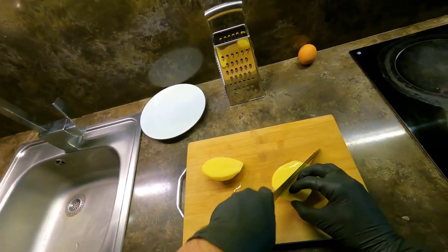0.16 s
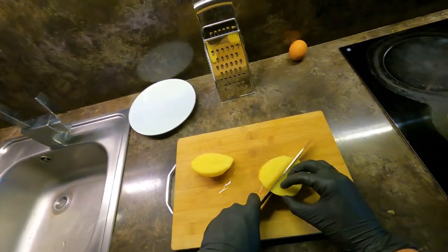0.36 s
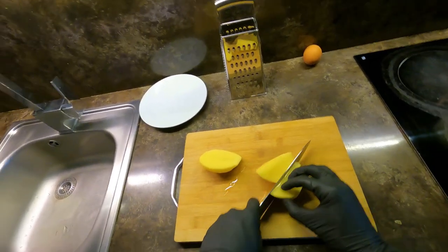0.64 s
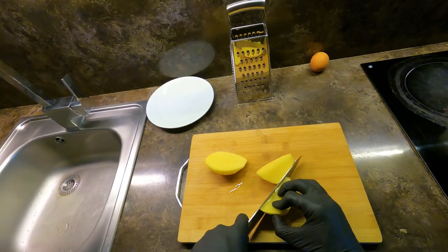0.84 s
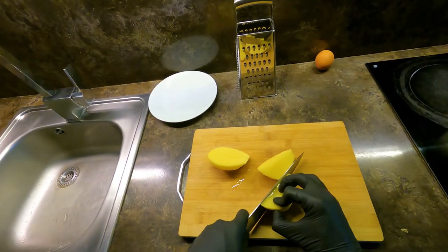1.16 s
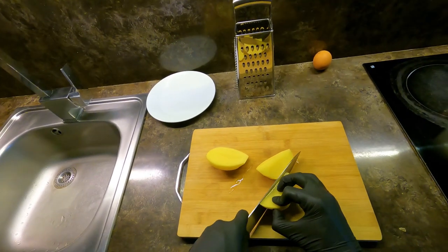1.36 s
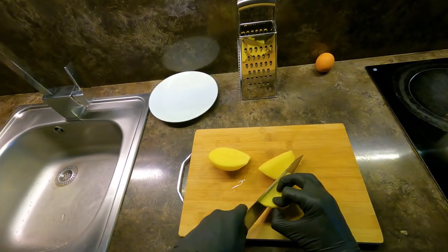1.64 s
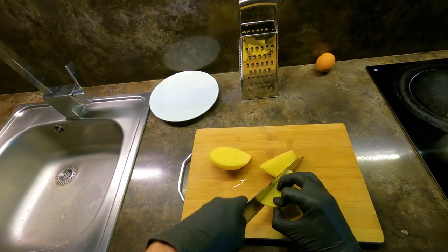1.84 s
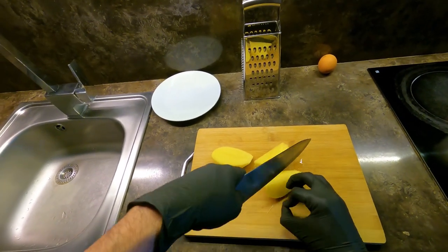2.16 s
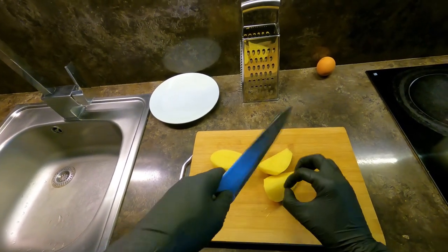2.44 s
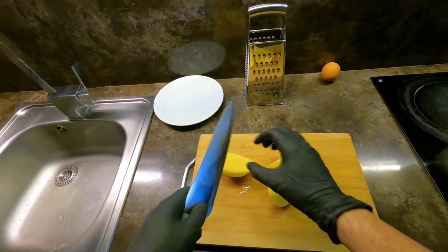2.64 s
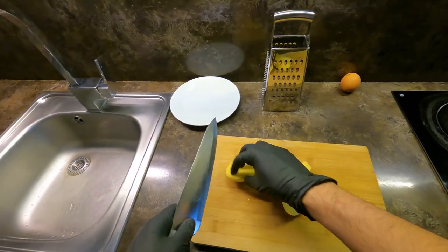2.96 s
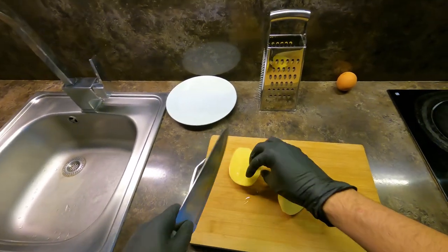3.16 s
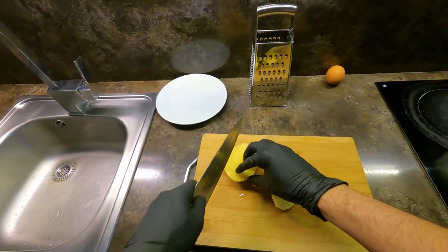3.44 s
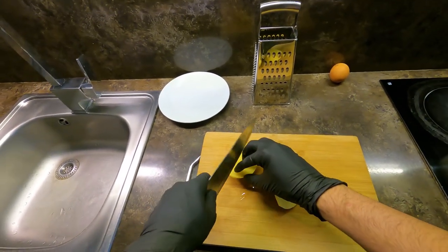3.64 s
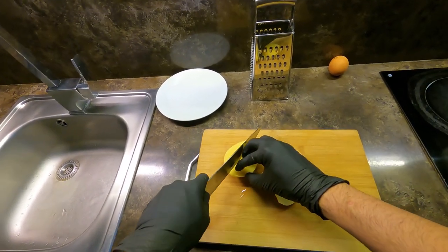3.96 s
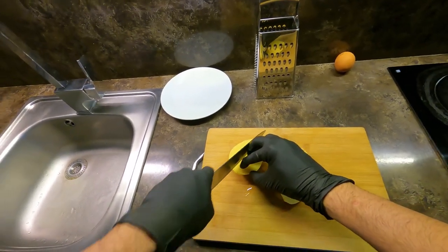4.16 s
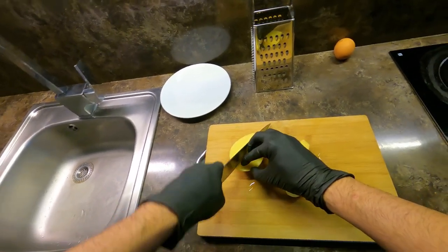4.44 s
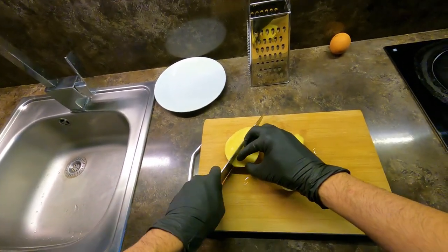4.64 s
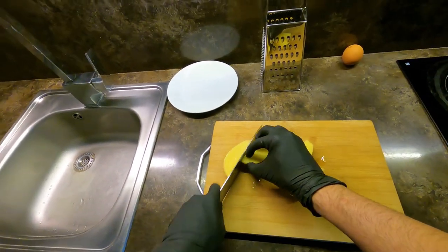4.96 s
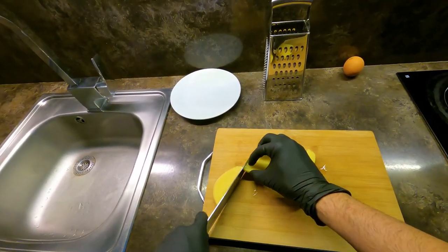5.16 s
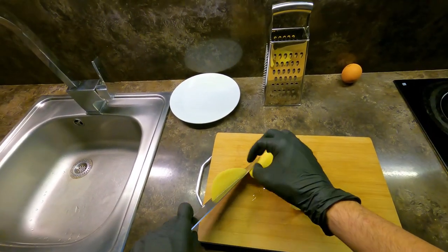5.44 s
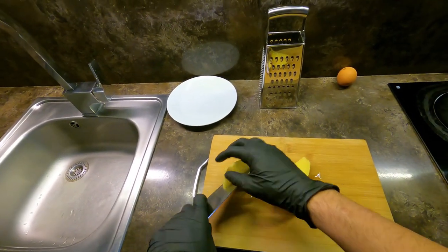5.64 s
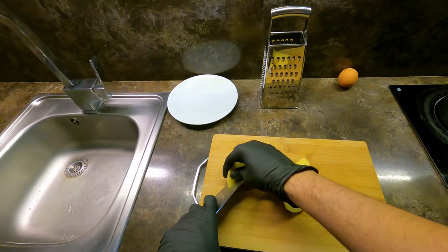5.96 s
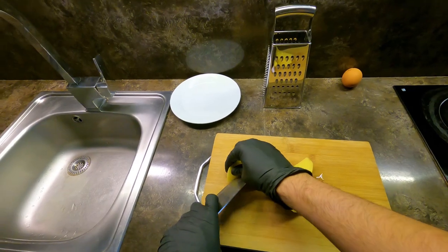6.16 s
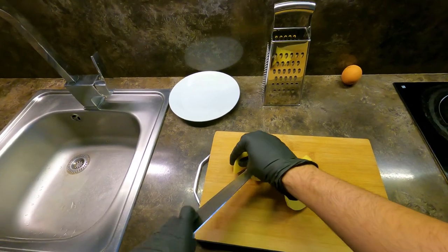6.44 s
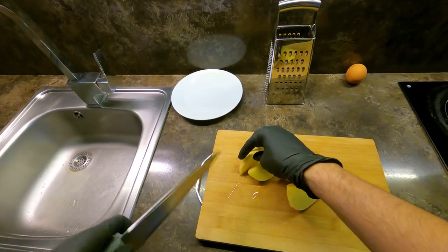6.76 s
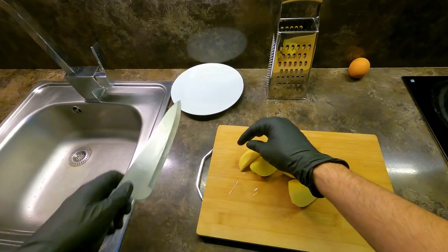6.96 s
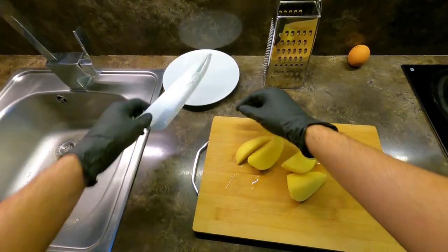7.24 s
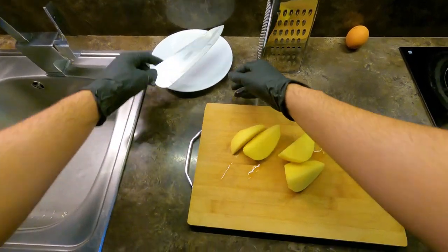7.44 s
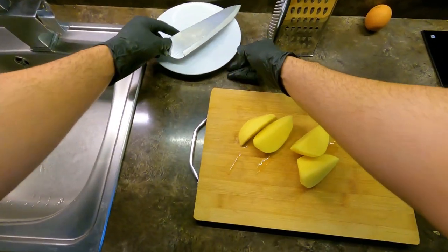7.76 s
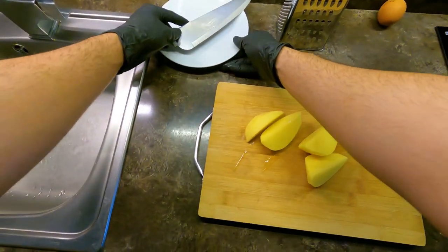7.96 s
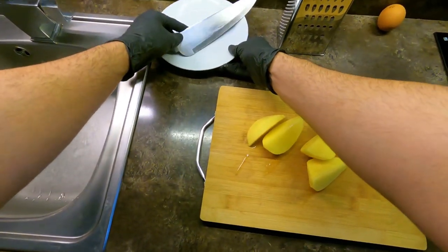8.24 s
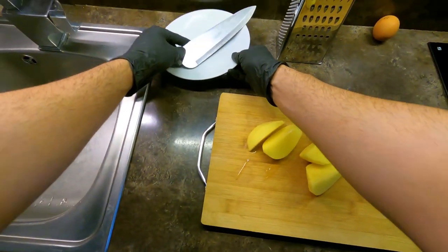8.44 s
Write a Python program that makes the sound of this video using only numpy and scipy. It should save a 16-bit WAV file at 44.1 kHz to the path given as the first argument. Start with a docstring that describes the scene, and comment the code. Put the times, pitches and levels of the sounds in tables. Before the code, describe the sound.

Close up in a small, lightly reverberant kitchen, over low moving air and faint appliance hum, a knife pushes through raw potato with juicy hiss and rasp, cracking onto a wooden board. Wedges drop with dull thuds and wet snaps. After a quieter pause with faint glove rustle, more cuts follow, the edge drags over wood and squeaks briefly. Finally handle, then blade, clink on a china plate.

```python
"""A knife cuts a raw potato on a wooden board in a small kitchen, over moving air and a steady appliance hum.
From the start bursting cells hiss and the blade's flanks rasp; the edge cracks on the board and makes it ring.
Wedges land and tip with dull thuds, wet flesh snaps and crackles, and rubber gloves rustle and squeal.
Later the edge judders along the wood, then squeaks once by stick and slip. At the end the knife is laid on a
china plate, handle first, then the blade: struck modes ring and clatter while steel rubs over the glaze."""
import sys
import numpy as np
from scipy import signal
from scipy.fft import rfft, irfft, next_fast_len
from scipy.io import wavfile

SR = 44100
rng = np.random.default_rng(int(sys.argv[2]) if len(sys.argv) > 2 else 0)


def unload_audio(sound):
    """Save the sound as a 16-bit wav file, at the path given as the first command line argument."""
    columns = np.transpose(np.atleast_2d(sound))
    # keep every value between -1 and 1, then stretch to whole-number steps
    steps = np.round(np.clip(columns, -1, 1) * 32767)
    wavfile.write(sys.argv[1], SR, steps.astype(np.int16))


N = 378819
TIME = np.arange(N) / SR
AGE = TIME[:SR * 2 // 3]   # time since a blow [s]

# Table levels are relative where a function adds gain of its own; T60 is the time of a 60 dB decay.


def from_db(db):
    """Logarithmic levels: decibels to amplitude gain."""
    return 10 ** (np.asarray(db) / 20)


def rms_one(x):
    """Normalisation: scale to an effective value of 1."""
    return x / np.sqrt(np.mean(x ** 2) + 1e-20)


def fade(t60):
    """Damping: exponential decay by 60 dB in t60 seconds after a blow."""
    return from_db(-60 * AGE / max(t60, 1e-3))


def at_hz(points, hz):
    """Logarithmic pitch: interpolate a table on a log-frequency axis."""
    known_hz, values = np.transpose(points)
    return np.interp(np.log(hz + 1), np.log(known_hz), values)


def convolve(x, response):
    """Linear superposition: every sample excites the response; the length is kept."""
    return signal.oaconvolve(x, response)[:len(x)]


def colour(x, spectrum, tilt_db=0, size=8192):
    """Minimum-phase filtering: a causal response with the spectrum, tilted in dB per octave about 1 kHz."""
    hz = np.maximum(np.arange(size // 2 + 1), 1) * SR / size
    tilt = tilt_db * np.log2(hz / 1000)
    low_rolloff = 12 * np.minimum(np.log2(hz / spectrum[0][0]), 0)   # below the first point
    db = at_hz(spectrum, hz) + tilt + low_rolloff
    # folding the cepstrum onto positive time makes the filter causal
    cepstrum = irfft(np.log(from_db(db)))[:size // 2]
    cepstrum[1:] *= 2
    return convolve(x, irfft(np.exp(rfft(cepstrum, size))))


def resonate(x, peaks):
    """Forced resonance: parallel resonators, each (frequency [Hz], width [Hz], level [dB])."""
    total = 0
    for hz, width, db in peaks:
        b, a = signal.iirpeak(hz, hz / width, fs=SR)
        total = total + from_db(db) * signal.lfilter(b, a, x)
    return total


def ring(modes):
    """Free vibration: damped sines of struck modes, each (frequency [Hz], level [dB], T60 [s])."""
    total = 0
    for k, (hz, db, t60) in enumerate(modes):
        sign = (-1) ** k
        total = total + sign * from_db(db) * fade(t60) * np.sin(2 * np.pi * hz * AGE)
    return total


def burst(t60):
    """Random impact sequence: a dying swarm of tiny contacts, of unit energy."""
    swarm = rng.standard_normal(len(AGE)) * fade(t60)
    return swarm / np.linalg.norm(swarm)


def grains(per_s, spread_db):
    """Poisson-like excitation: random micro-clicks of uneven size and sign."""
    sizes = from_db(spread_db * np.minimum(rng.exponential(1, N), 4))
    happens = rng.random(N) < per_s / SR
    return happens * sizes * rng.choice([-1, 1], N)


def drift(per_s):
    """Slow random modulation: straight lines between normal random values, per_s of them a second."""
    knots = rng.standard_normal(4096)
    return np.interp(TIME * per_s, np.arange(len(knots)), knots)


def stroke(start, length, swell_db, rise_s, release_t60):
    """Amplitude envelope of one hand movement: builds up until start, swells or eases, then decays."""
    attack = np.clip(1 + (TIME - start) / rise_s, 0, 1) ** 2
    progress = np.clip((TIME - start) / length, 0, 1)
    released = np.clip((TIME - start - length) / release_t60, 0, 2)
    return attack * from_db(swell_db * (progress - .5)) * .001 ** released


def add(track, s, sound):
    """Superposition: mix a sound in at time s."""
    start = int(s * SR)
    track[start:start + len(sound)] += sound[:N - start]


# Steady lines of the appliance: (frequency [Hz], rms level [dB])
HUM = [(100, -53.5), (200, -60), (300, -63.5), (348, -65.5), (614, -75), (1030, -66.5), (1080, -67)]


def hum(waver=0.17):
    """Periodic excitation: mains and motor lines of an appliance, wavering slightly in level."""
    total = 0
    for hz, db in HUM:
        line = np.sqrt(2) * np.sin(2 * np.pi * (hz * TIME + rng.random()))
        total = total + from_db(db) * line * (1 + waver * drift(per_s=4))
    return total


# Spectrum of the room's noise: (frequency [Hz], level [dB])
AIR = [(12, -29.5), (20, 2), (70, 6), (103, 1.5), (124, -3), (263, -8.5), (302, -11.5), (540, -21),
       (966, -38), (1050, -32.5), (1590, -36), (5530, -56.5), (10500, -51.5), (11700, -42), (15000, -92)]
# Narrow resonant humps in that noise: (frequency [Hz], width [Hz], level [dB])
AIR_HUMPS = [(325, 31, 5), (1080, 240, 11.5), (2875, 296, 17.5), (4680, 130, 19.5), (5560, 1100, 23),
             (12100, 600, 8)]


def room_noise():
    """Broadband noise: moving air and rumble, with a few resonant humps."""
    white = rng.standard_normal(N)
    return rms_one(colour(white + resonate(white, AIR_HUMPS), AIR))


# Modes of the board on the counter: (frequency [Hz], level [dB], T60 [s])
BOARD = [(61.9, 0, 0.37), (97.5, 0.5, 0.3), (128, -8, 0.23), (156.2, -4, 0.25), (224, 3.5, 0.13),
         (322.5, -10.5, 0.3), (394.4, -7, 0.36), (501, -1, 0.097), (642, 3, 0.056)]


def board_blow(contact_s):
    """Contact-time filtering: a smooth push rings the board; longer contact gives a duller sound."""
    push = np.sin(np.pi * np.minimum(AGE / contact_s, 1)) ** 2
    return convolve(ring(BOARD), push / push.sum())


# Pushes through the flesh: (time [s], length [s], hiss level [dB], swell over the push [dB],
# rasp above the hiss [dB], release T60 [s])
CUTS = [(0, 0.19, -50.5, 5, 5.5, 0.045), (0.243, .15, -47, 6.5, 8, 0.22),
        (0.412, 0.053, -44, 3.5, 5.5, 0.14), (0.727, 0.048, -52, 11.5, 6.5, 0.25),
        (0.854, 0.077, -51.5, -1, 7, 0.39), (4.321, 0.1, -45.5, 4, 3.5, 0.048),
        (4.543, 0.14, -45, -0.5, 8.5, 0.14), (5.027, 0.079, -54, 4.5, -11, 1.1),
        (5.41, 0.11, -61.5, -2, 2, 0.63)]
# Spectrum of the bursting cells: (frequency [Hz], level [dB])
HISS = [(1200, -28.5), (2500, 5.5), (4500, 2), (6800, -1.5), (8500, -9.5), (12000, -11.5), (15500, -42)]
# Spectrum of the rubbing flanks: (frequency [Hz], level [dB])
RASP = [(250, -17), (600, -2), (850, -8), (1150, 1), (1500, -4), (2200, -6), (3000, -23), (5000, -40)]
# Resonances of the blade pressed on the wood, also in drag(): (frequency [Hz], width [Hz], level [dB])
HELD_BLADE = [(645, 22, 9.5), (1034, 26, 4), (1770, 16, 7), (1975, 29, 8), (2060, 21, -3), (2530, 69, -10),
              (3240, 27, 3), (4250, 120, -14), (4500, 160, 3)]


def slicing(tearing_db=0.9, board_db=0.0, bite_s=0.023):
    """Fracture and friction: cells burst in tears, flanks rasp; the edge's push makes the board rumble."""
    edge = flanks = 0
    for start, length, db, swell_db, rasp_db, release_t60 in CUTS:
        rise_s = bite_s + 0.33 * length   # longer pushes also bite more slowly
        push = from_db(db) * stroke(start, length, swell_db, rise_s, release_t60)
        edge = edge + push
        flanks = flanks + from_db(rasp_db) * push
    tears = from_db(tearing_db * drift(per_s=130))
    cells = tears * grains(per_s=5000, spread_db=2.0)
    friction = tears * grains(per_s=1000, spread_db=1.5)
    hiss = rms_one(colour(cells + 0.29 * resonate(cells, HELD_BLADE), HISS))
    rasp = rms_one(colour(friction, RASP))
    rumble = rms_one(convolve(friction, board_blow(contact_s=0.0058)))
    at_edge = (from_db(-3.0) * hiss + from_db(board_db) * rumble) * edge
    return at_edge + from_db(-9) * rasp * flanks


# Edge meets board: (time [s], crack level [dB], thump level [dB], brightness [dB/octave],
# shudder level [dB], shudder T60 [s], contact pitch [Hz])
CHOPS = [(0.1793, 7.5, -30.5, -2.8, -4, 0.44, 4540), (4.4231, 2.5, -22, 0.3, 3.5, 0.35, 2280),
         (6.1035, -30, -37.5, 4.5, -13, .1, 520), (6.9342, -5, -30, 3, -15, 0.18, 6560)]
# Spectrum of the crack on the wood: (frequency [Hz], level [dB])
CRACK = [(150, -23), (400, -16.5), (700, -11), (1000, 2.5), (1250, -2.5), (1800, -8), (2500, -12.5),
         (4800, -23), (6500, -32), (13000, -60)]


def chops(bounce_s=.0027, bounce_db=-5):
    """Impact and rebound: the edge cracks on the wood, bounces, and leaves blade and board shuddering."""
    out = np.zeros(N)
    # the light blade bounces off and hardly moves the board as a whole
    without_lows = signal.butter(2, 170, "high", fs=SR, output="sos")
    for s, crack_db, thump_db, bright_db, shudder_db, shudder_t60, contact_hz in CHOPS:
        force = (AGE == 0) + from_db(4) * burst(t60=.06)
        force[int(bounce_s * SR)] += from_db(bounce_db)
        # the part of the edge that lands decides which pitch stands out
        force = force + resonate(force, [(contact_hz, 0.32 * contact_hz, 2)])
        shudder = resonate(burst(shudder_t60), [(1210, 400, shudder_db + 8.5)])
        crack = colour(force + shudder, CRACK, bright_db)
        thump = signal.sosfilt(without_lows, board_blow(contact_s=0.002))
        add(out, s, from_db(crack_db + 8) * crack)
        add(out, s + 0.0014, from_db(thump_db + 2.0) * thump)
    return out


# A wedge lands, then tips onto its face: (time [s], landing level [dB], tipping level [dB], contact [s])
ROCKINGS = [(0.511, -29, -39, 0.0055), (.575, -25, -31, 0.0057), (.734, -29, -31, .0042),
            (0.847, -32, -29, .0072), (2.123, -24, -34, 0.0067), (2.172, -26, -26.5, 0.0057),
            (2.336, -23.5, -38, 0.012), (2.988, -38, -36, 0.0053), (3.437, -40.5, -63, 0.0031),
            (3.956, -34, -51, 0.0055), (4.707, -29.5, -36, 0.013), (4.784, -34, -51, 0.0088),
            (5.533, -29, -33.5, 0.0072), (5.64, -37, -31, 0.0074), (6.142, -34.5, -56, 0.0079),
            (6.897, -33.5, -50, 0.004), (6.948, -26.5, -42, 0.0087)]


def thuds(tip_s=.041, tip_softer=1.31, jolt_db=-25.5, jolt_contact_s=0.013):
    """Soft impact: wedges land, then tip with a second, longer contact; the plate jolts the counter once."""
    out = np.zeros(N)
    for s, landing_db, tipping_db, contact_s in ROCKINGS:
        add(out, s, from_db(landing_db) * board_blow(contact_s))
        add(out, s + tip_s, from_db(tipping_db) * board_blow(contact_s * tip_softer))
    # the knife's handle jolts the counter through the plate at its first touch
    add(out, HANDLE_TOUCHES[0][0], from_db(jolt_db) * board_blow(jolt_contact_s))
    return out


# Flesh parts and sticks to the blade: (time [s], level [dB], crackle level [dB], centre frequency [Hz])
SNAPS = [(.574, -27, 0, 820), (0.7312, -29, -1, 900), (.919, -20, 5.5, 2000), (1.105, -34, 7, 8150),
         (1.13, -28.5, 8.5, 4500), (2.0479, 1.5, -5.5, 6400), (2.0895, -13.5, 2, 3950),
         (2.126, -32, 20.5, 7000), (2.604, -36, 5, 4730), (4.789, -31.5, 5.5, 6200),
         (5.707, -29.5, -1, 2400), (6.149, -35.5, 14, 2930), (7.143, -32, 4, 3000), (7.201, -27, -1, 2520),
         (7.7599, -22, -0.5, 4850)]
# Spectrum of a wet snap, also in squeak(): (frequency [Hz], level [dB])
SNAP = [(300, 10), (800, -5), (1300, 6), (3000, 1.5), (6700, -1), (8500, -7.5), (10000, -11.5),
        (12300, -10.5), (15000, -29)]


def snaps(clumping_db=2.5, shortest_t60=.02, growth_s=0.027):
    """Brittle fracture: a sharp break of its own pitch, then wet, clumpy crackle, longer when stronger."""
    out = np.zeros(N)
    for s, db, crackle_db, hz in SNAPS:
        t60 = shortest_t60 + growth_s * from_db(crackle_db)
        crackle = burst(t60) * from_db(clumping_db * drift(per_s=250)[:len(AGE)])
        force = (AGE == 0) + from_db(crackle_db) * crackle / np.linalg.norm(crackle)
        # each snap has its own pitch
        pitched = resonate(force, [(hz, 0.45 * hz, 2)])
        add(out, s, from_db(db) * (0.48 * force + pitched))
    return colour(out, SNAP)


# Rubber gloves shift their grip on wet pieces: (time [s], length [s], level [dB])
GRIPS = [(2.35, 0.55, -71.5), (3.95, .22, -77), (5.56, 0.91, -72), (6.983, 0.28, -62.5),
         (7.462, 0.61, -68.5)]
# Spectrum of the rubber's crackle: (frequency [Hz], level [dB])
RUSTLE = [(1200, -9), (3000, -3), (4500, -2), (6300, -2), (8500, -7.5), (12500, -24), (15000, -45)]
# Wet rubber squeals: (time [s], length [s], start frequency [Hz], end frequency [Hz], level [dB])
SQUEALS = [(2.34, 0.4, 6070, 5450, -67), (3.007, 0.029, 6340, 6070, -58)]


def gloves(jitter=0.037):
    """Adhesion and sliding: rubber crackles finely, ticks as it sticks, and squeals thinly as it slides."""
    grip = 0
    for start, length, db in GRIPS:
        grip = grip + from_db(db) * stroke(start, length, swell_db=2.0, rise_s=0.096, release_t60=1.0)
    sticky_ticks = from_db(11.5) * grains(per_s=14, spread_db=3.0)
    crackle = grains(per_s=3500, spread_db=3.0) + sticky_ticks
    out = grip * rms_one(colour(crackle, RUSTLE))
    for s, length, start_hz, end_hz, db in SQUEALS:
        progress = np.minimum(AGE / length, 1)
        glide_hz = start_hz + (end_hz - start_hz) * progress
        hz = glide_hz * (1 + jitter * drift(per_s=400)[:len(AGE)])
        swell = np.sin(np.pi * progress)
        add(out, s, from_db(db) * swell * np.sin(2 * np.pi * np.cumsum(hz) / SR))
    return out


# Spectrum of the edge dragged over wood: (frequency [Hz], level [dB])
DRAG_COLOUR = [(400, 3), (700, -2.5), (1100, 1), (1450, -7), (2000, -5), (3000, -10.5), (4700, -15),
               (6000, -14.5), (12000, -33)]


def drag(start_s=5.03, length_s=0.33, level_db=-50, swell_db=-5.5, uneven_db=6.5):
    """Friction-driven resonance: the edge judders along the wood; shifting contact favours changing modes."""
    slips = grains(per_s=1500, spread_db=1.0) * from_db(1.6 * drift(per_s=70))
    rings = 0
    for peak in HELD_BLADE:
        rings = rings + resonate(slips, [peak]) * from_db(uneven_db * drift(per_s=20))
    pull = stroke(start_s, length_s, swell_db, rise_s=0.15, release_t60=0.35)   # eases off as it goes
    return from_db(level_db) * pull * rms_one(colour(slips + rings, DRAG_COLOUR))


# The blade's ring when its edge catches: (frequency [Hz], width [Hz], level [dB])
CAUGHT_BLADE = [(746, 550, -8.5), (1510, 540, -24), (2370, 300, 0), (3180, 1400, -13), (5450, 320, -12),
                (7200, 260, -4.5)]


def squeak(start=6.1975, slip_hz=775, hold_s=0.024, jitter=0.096, level_db=-6):
    """Stick-slip: the catching edge rings the blade; a rough scrape starts with it and dies more slowly."""
    out = np.zeros(N)
    slip_rate = slip_hz * (1 + jitter * drift(per_s=600)[:len(AGE)])
    cycles = np.floor(np.cumsum(slip_rate) / SR)
    slips = np.diff(cycles, prepend=-1) * (AGE < hold_s)   # one click at the start of each cycle
    caught = colour(resonate(slips, CAUGHT_BLADE), SNAP, tilt_db=-2.0)
    scrape = colour(burst(t60=0.58), SNAP, tilt_db=-3.0)
    add(out, start, from_db(level_db) * caught)
    add(out, start, from_db(level_db - 5.5) * scrape)
    return out


def on_plate(touches, modes, clatter, clatter_db, clatter_t60, rise_s):
    """Modal excitation: each touch sets off a dying clatter while the modes swell and ring on."""
    out = np.zeros(N)
    tone = ring(modes) * (1 - np.exp(-AGE / rise_s))
    for s, db in touches:
        chatter = from_db(clatter_db) * colour(burst(clatter_t60), clatter)
        add(out, s, from_db(db) * (tone + chatter))
    return out


# Handle touches the plate: (time [s], level [dB])
HANDLE_TOUCHES = [(7.9062, -18), (7.948, -30.5), (8.157, -47)]
# Modes of the plate: (frequency [Hz], level [dB], T60 [s])
PLATE = [(164, -10, 0.16), (233, -6, 0.14), (375, 0, 0.085), (590.5, -9.5, 0.3), (652, -4, 0.18),
         (702, -18, 0.3), (784, -34, 0.15), (1013, -25, 0.19), (1345, -6, 0.071), (2477, -0.5, .13),
         (2676, -17, 0.14), (3587, -8, 0.074), (3650, -6.5, 0.077), (4310, -13.5, 0.22), (4770, -18, 0.11),
         (6140, -18.5, 0.046), (7400, -30.5, 0.13)]
# Spectrum of the plate's dense clatter: (frequency [Hz], level [dB])
PLATE_CLATTER = [(50, -21), (200, 4.5), (700, 7.5), (1100, -7), (1900, -12.5), (3700, -15), (5200, -29),
                 (8000, -35), (13000, -55)]


def handle_on_plate():
    """Struck plate: the handle's touches ring the modes of the china."""
    return on_plate(HANDLE_TOUCHES, PLATE, PLATE_CLATTER, clatter_db=32.5, clatter_t60=0.24, rise_s=0.0027)


# The knife pushed into place on the glaze: (time [s], length [s], level [dB], swell [dB])
SLIDES = [(8.06, 0.095, -56.5, 11), (8.375, 0.13, -49.5, -4.5)]


def slide():
    """Sustained friction: steel rubs over china, keeping the modes of both faintly alive."""
    push = 0
    for start, length, db, swell_db in SLIDES:
        push = push + from_db(db) * stroke(start, length, swell_db, rise_s=0.1, release_t60=0.21)
    friction = grains(per_s=4500, spread_db=6.0)
    sung = rms_one(convolve(friction, ring(PLATE) + from_db(-6.5) * ring(BLADE)))
    rubbed = rms_one(colour(friction, BLADE_CLATTER, tilt_db=-6.0))
    return push * (from_db(-4.5) * sung + from_db(1.5) * rubbed)


# Blade touches the plate: (time [s], level [dB])
BLADE_TOUCHES = [(8.332, -34), (8.338, -31)]
# Modes heard from the blade on the plate: (frequency [Hz], level [dB], T60 [s])
BLADE = [(209, -10, 0.68), (386, -11.5, 0.6), (586.5, 1, 0.28), (1072, -1.5, 0.32), (1266, 0, 0.17),
         (2100, -9, 0.12), (2540, 6.5, 0.052), (2750, 2.5, 0.23), (3680, -15, 0.12), (4253, 2.5, 0.069),
         (4670, 5.5, 0.042), (5200, -10, 0.067), (6270, 1.5, 0.082), (6840, -26, 0.2), (8450, -29, 0.072),
         (9378, -11.5, 0.081), (11700, -30, 0.061)]
# Spectrum of the blade's clatter: (frequency [Hz], level [dB])
BLADE_CLATTER = [(200, -20.5), (600, 1.5), (1200, 2), (1800, -3.5), (2600, 0), (3500, -3.5), (6500, 2),
                 (9000, -15), (12500, -12), (15500, -39)]


def blade_on_plate():
    """Struck bar: the blade's touches ring its bright modes."""
    return on_plate(BLADE_TOUCHES, BLADE, BLADE_CLATTER, clatter_db=35, clatter_t60=0.049, rise_s=0.00057)


# Reverberation time of the kitchen: (frequency [Hz], T60 [s])
ROOM_T60 = [(100, 0.62), (400, 0.71), (1200, 0.68), (4000, 0.25), (12000, 0.22)]


def kitchen_response(early_db, late_db):
    """Reverberation: quick reflections off counter and wall, then a tail that dies band by band."""
    edges = np.geomspace(150, 16000, 8)
    tail = 0
    for low, high in zip(edges, edges[1:]):
        band = signal.butter(2, [low, high], "band", fs=SR, output="sos")
        t60 = at_hz(ROOM_T60, np.sqrt(low * high))
        tail = tail + signal.sosfilt(band, burst(t60))
    without_lows = signal.butter(1, 300, "high", fs=SR, output="sos")
    early = signal.sosfilt(without_lows, burst(t60=0.059))
    return from_db(early_db) * early * (AGE > .002) + from_db(late_db) * tail * (AGE > .008)


def scene():
    """Mid-side stereo: the work is straight ahead; reflections and room noise give a little width."""
    cutting = slicing() + chops() + thuds() + snaps() + gloves() + drag() + squeak()
    work = cutting + handle_on_plate() + slide() + blade_on_plate()
    mid_echo = convolve(work, kitchen_response(early_db=-12.5, late_db=-8.5))
    mid = work + mid_echo + from_db(-48.0) * room_noise() + hum()
    side_echo = convolve(work, kitchen_response(early_db=-3, late_db=-11.5))
    side = side_echo + from_db(-47.5) * room_noise()
    # close microphones hear long waves alike
    side = colour(side, [(20, -17), (120, -17), (500, -9.5), (1200, -2.5), (5000, -11.0), (12000, -13.0)])
    return np.array([mid + side, mid - side])


# Phase of the left microphone against the right: (frequency [Hz], phase [rad])
PORT_PHASE = [(60, 0.059), (600, -0.22), (1200, -0.23), (2300, -0.71), (5000, -0.69), (12000, -0.81)]


def record(dry, cutoff_hz=15600):
    """Phase shift and band limit: the left microphone lags in all but the lows; the top is cut steeply."""
    size = next_fast_len(N + SR)
    hz = np.arange(size // 2 + 1) * SR / size
    turn = np.exp(1j * at_hz(PORT_PHASE, hz))
    left = irfft(rfft(dry[0], size) * turn, size)[:N]
    lowpass = signal.ellip(10, .1, 80, cutoff_hz, fs=SR, output="sos")
    return signal.sosfilt(lowpass, np.array([left, dry[1]]))


dry = scene()
out = record(dry)
unload_audio(out)
```